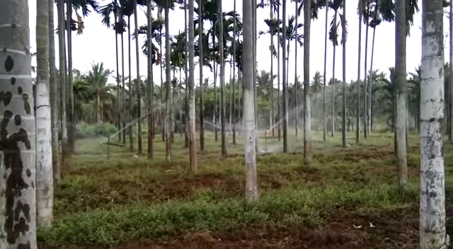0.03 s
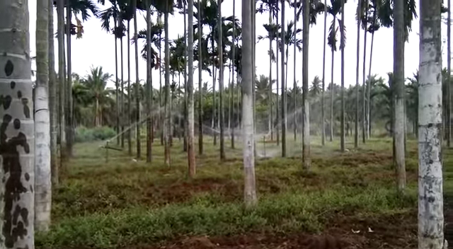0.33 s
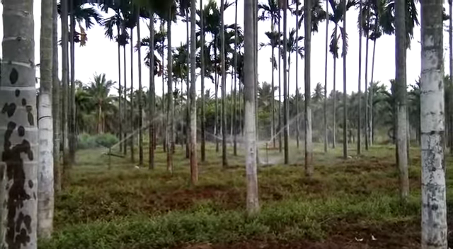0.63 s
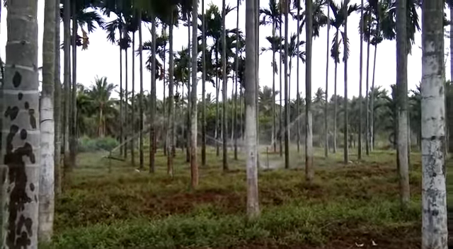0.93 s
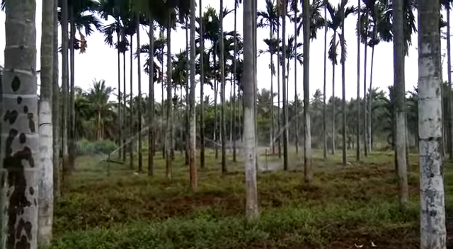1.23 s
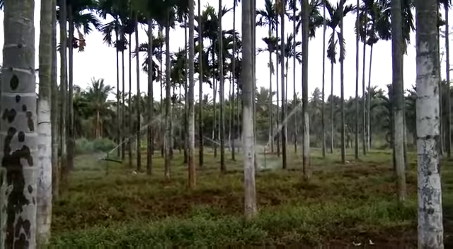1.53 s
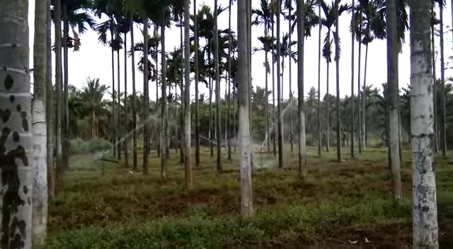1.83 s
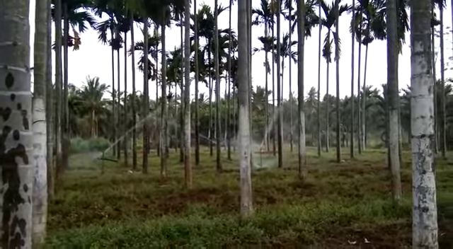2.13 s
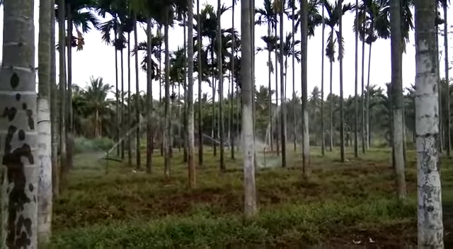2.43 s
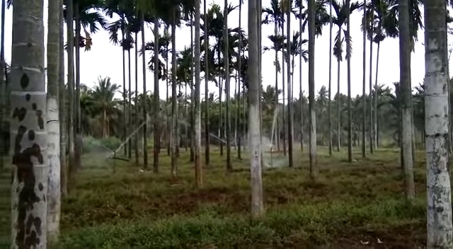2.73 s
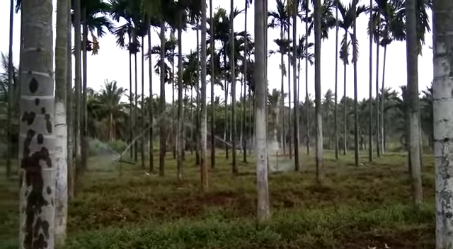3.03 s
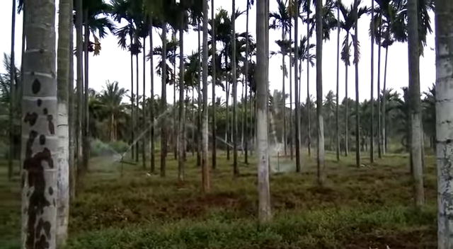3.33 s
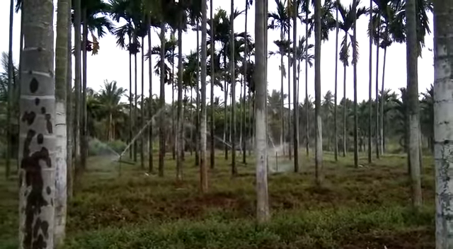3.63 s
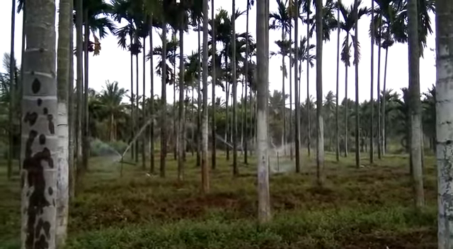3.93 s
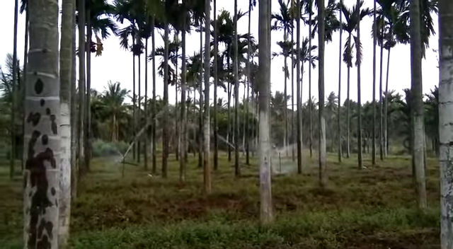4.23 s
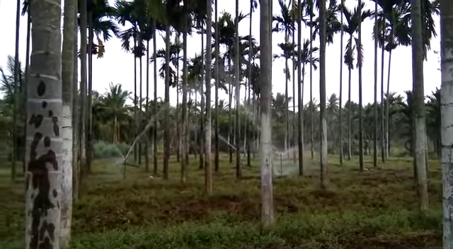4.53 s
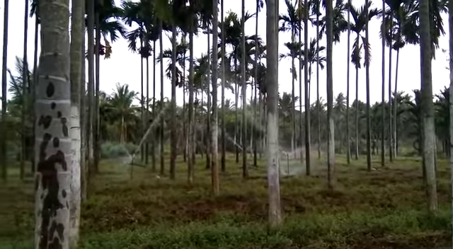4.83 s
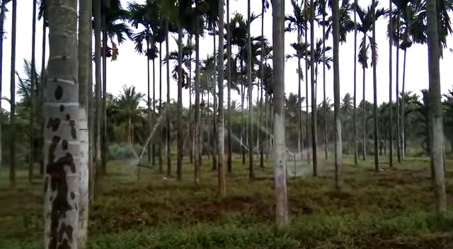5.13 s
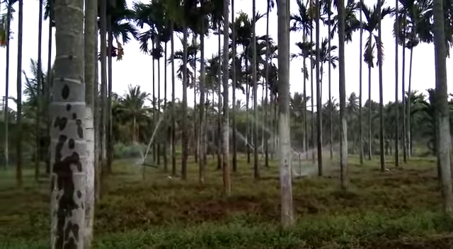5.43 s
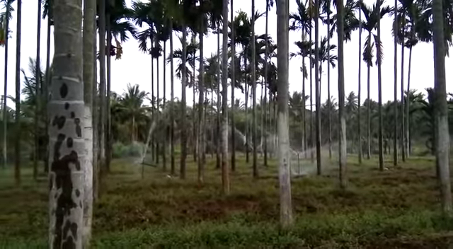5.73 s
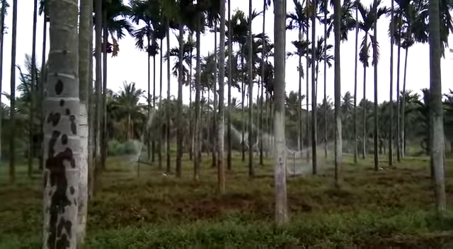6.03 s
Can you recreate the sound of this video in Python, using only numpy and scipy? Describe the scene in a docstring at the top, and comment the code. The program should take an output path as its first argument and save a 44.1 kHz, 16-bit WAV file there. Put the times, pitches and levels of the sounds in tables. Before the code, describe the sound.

An impact sprinkler ticks from start to finish, about six seconds, some way from a hand-held phone in a palm grove. Its arm slaps through the jet about five times a second, each tick bright, wet and slightly metallic, with a short echo. Water patters and hisses lightly on grass and leaves, swelling briefly around 1.1 seconds and then growing slowly. A few heavier drops tick on nearby leaves, the clearest at 0.7 seconds. Insects keep up a thin, high trill throughout. At 1.8 seconds the phone takes one soft, dull knock. Underneath lie a faint low rumble, a far rustle and a barely audible engine that sags near 2 seconds and picks up again. Faint gliding whistles, perhaps birds, come at the start and around 0.8, 3.5 and 5 seconds. A quiet low hum sets in at 5.5 seconds and holds.

```python
"""Palm grove, an impact sprinkler some way from a hand-held phone. Its arm slaps through the jet about
five times a second and rings; water patters on grass and leaves, swelling once as the jet sweeps foliage.
Insects scrape their wings, trilling near 7 kHz over a distant engine, faint whistles, rumble and rustle.
The phone takes one soft knock; a low hum sets in near the end."""
import sys
import numpy as np
from scipy import signal
from scipy.fft import rfft, irfft
from scipy.io import wavfile
from scipy.ndimage import uniform_filter1d

SR = 44100
rng = np.random.default_rng(int(sys.argv[2]) if len(sys.argv) > 2 else 0)


def log_audio(samples):
    """Write samples as a 16-bit WAV file to the path given in sys.argv[1]."""
    # one column per channel
    frames = np.atleast_2d(samples).T
    # limit to full scale, then quantise
    limited = np.clip(frames, -1, 1)
    pcm = np.round(limited * 32767).astype(np.int16)
    wavfile.write(sys.argv[1], SR, pcm)


N = 272097
TIME = np.arange(N) / SR

# arm swings: entry t/s, relative entry level/dB, relative exit level/dB
ARM_SWINGS = [(.022, -38, -34), (.231, -38, -41), (.460, -37, -32), (.663, -38, -42), (.893, -38, -38),
              (1.098, -36, -35), (1.313, -38, -31), (1.488, -34, -36), (1.697, -36, -34), (1.895, -37, -41),
              (2.131, -35, -40), (2.362, -36, -32), (2.557, -33, -36), (2.786, -38, -36), (2.988, -33, -32),
              (3.189, -34, -32), (3.392, -32, -35), (3.590, -35, -41), (3.824, -37, -36), (4.029, -36, -40),
              (4.255, -39, -34), (4.454, -36, -33), (4.656, -33, -37), (4.861, -35, -35), (5.073, -35, -39),
              (5.290, -34, -40), (5.518, -36, -37), (5.723, -38, -33), (5.927, -37, -34), (6.130, -36, -43)]
DWELL_S = .0175  # arm in the jet


def undb(db):
    """dB to gain."""
    return 10 ** (np.asarray(db) / 20)


def unit(x):
    """Scale to rms 1."""
    return x / np.sqrt(np.mean(x ** 2))


def curves(table):
    """Columns after t/s, interpolated over TIME."""
    times_s, *columns = np.transpose(table)
    return [np.interp(TIME, times_s, column) for column in columns]


def colour(x, points):
    """Filter by (f/Hz, level/dB) points; white noise keeps its power."""
    hz, db = np.transpose(points)
    bins_hz = np.maximum(np.fft.rfftfreq(N, 1 / SR), 1)
    gain = undb(np.interp(np.log(bins_hz), np.log(hz), db))
    skirts = np.minimum(bins_hz / hz[0], 1) ** 2 * np.minimum(hz[-1] / bins_hz, 1) ** 2
    return irfft(rfft(x) * unit(gain * skirts), N)


def walk(steps_per_s):
    """Random steps, smoothed twice; rms 1."""
    hold = max(int(SR / steps_per_s), 2)
    steps = np.repeat(rng.standard_normal(N // hold + 1), hold)
    return unit(uniform_filter1d(uniform_filter1d(steps, hold), hold)[:N])


def drops(per_s, spread_db):
    """Random impacts, many small, few large; rms 1."""
    size = undb(spread_db * np.minimum(rng.exponential(size=N), 7))
    hits = rng.random(N) < per_s / SR
    return unit(hits * size * rng.standard_normal(N))


def burst(peak_s, rise_s, fall_s):
    """Envelope: exponential rise and fall."""
    age_s = TIME - peak_s
    return np.exp(-np.minimum(np.maximum(-age_s / rise_s, age_s / fall_s), 20))


def sprinkler(enter_gain_db=4, leave_gain_db=3, sheet_db=-41, ragged_db=1, echo_db=-15, echo_s=.041):
    """The arm slaps into the jet, shreds it and flings it off; trunks scatter the sound."""
    # jet breaking on the arm: f/Hz, relative level/dB
    slap_spectrum = [(1000, -27.5), (1700, -14), (2400, -13.5), (2900, -22.5), (4200, -10), (4800, -15.5),
                     (5200, 0), (5900, 0.5), (6900, -9.5), (7900, -7), (8600, -21), (9300, -21),
                     (12000, -39.5), (15000, -26.5)]
    slaps, in_jet = np.zeros(N), np.zeros(N)
    for enter_s, enter_db, leave_db in ARM_SWINGS:
        leave_s = enter_s + DWELL_S
        slaps += undb(enter_db + enter_gain_db) * burst(enter_s, rise_s=.0016, fall_s=.003)
        slaps += undb(leave_db + leave_gain_db) * burst(leave_s, rise_s=.0016, fall_s=.002)
        in_jet += (TIME > enter_s - .005) & (TIME < leave_s + .005)
    sheet = undb(sheet_db) * uniform_filter1d(in_jet, size=360)
    lumps = unit(undb(ragged_db * walk(900)) * rng.standard_normal(N))  # jet breaks up unevenly
    direct = colour(np.hypot(slaps, sheet) * lumps, slap_spectrum)
    trunks = rng.standard_normal(N) * np.exp(-TIME / echo_s)
    echo = signal.fftconvolve(direct, trunks / np.linalg.norm(trunks))[:N]
    return direct + undb(echo_db) * echo


def arm_ring(mean_hz=5675, scatter_hz=259, gain_db=5):
    """Each slap briefly rings the metal arm, at a slightly different pitch."""
    out = np.zeros(N)
    for enter_s, enter_db, leave_db in ARM_SWINGS:
        for slap_s, db in ((enter_s, enter_db), (enter_s + DWELL_S, leave_db)):
            hz = mean_hz + scatter_hz * rng.standard_normal()
            envelope = undb(db + gain_db) * burst(slap_s, rise_s=.0007, fall_s=.0018)
            out += envelope * np.sin(2 * np.pi * hz * (TIME - slap_s))
    return out


def falling_water(patter_db=-47.5, mist_db=-67, turn_db_per_s=.68, sweep_s=1.11, sweep_width_s=.2):
    """Drops patter, mist hisses; both grow as the jet turns and swell as it sweeps foliage."""
    # drops on grass and leaves: f/Hz, relative level/dB
    patter_spectrum = [(700, -33), (1300, -15), (1800, -7), (3000, -7.5), (3900, -11), (4800, -6),
                       (5700, 1), (6800, 0.5), (7600, -7), (8400, -12.5), (9200, -13.5), (10200, -30.5),
                       (12000, -32)]
    # finest drops: f/Hz, relative level/dB
    mist_spectrum = [(4000, -27), (8500, -6), (10000, 1.5), (12000, -4.5), (14500, 5), (15500, 2)]
    foliage_db = 9 * np.exp(-((TIME - sweep_s) / sweep_width_s) ** 2)
    jet_db = turn_db_per_s * TIME + foliage_db
    impacts = unit(drops(per_s=10000, spread_db=2.26) + rng.standard_normal(N))
    patter = colour(impacts, patter_spectrum)
    mist = colour(drops(per_s=20000, spread_db=1.5), mist_spectrum)
    flicker_db = walk(25.005)
    patter *= undb(patter_db + .33 * jet_db + flicker_db)
    mist *= undb(mist_db + jet_db + flicker_db)
    return patter + mist


def drips():
    """Heavy drops tick on well-damped leaves nearby."""
    # leaf hits: t/s, level/dB, f/Hz, decay/s
    leaf_hits = [(.07, -44, 4300, .002), (.709, -38, 6600, .0015), (1.074, -45, 4600, .002),
                 (1.19, -44, 4200, .002), (1.542, -45, 3800, .002), (3.925, -44, 3600, .003),
                 (4.15, -48, 2800, .008), (4.15, -55, 600, .04), (4.166, -47, 3600, .008),
                 (4.551, -44, 5200, .0015), (5.345, -41, 4700, .0015)]
    out = np.zeros(N)
    for hit_s, db, hz, fall_s in leaf_hits:
        leaf = signal.butter(1, [.7 * hz, 1.3 * hz], "band", fs=SR, output="sos")
        splash = signal.sosfilt(leaf, signal.sosfilt(leaf, rng.standard_normal(N)))
        out += undb(db) * burst(hit_s, rise_s=.0005, fall_s=fall_s) * unit(splash)
    return out


def insect(phrases_per_s, top_hz, end_hz, stroke_s, scatter_db, drift_s=.007, jitter_s=.0005):
    """Each wing stroke drags scraper over file and slows: a short falling chirp."""
    # wing strokes of one phrase: t/s, relative level/dB
    phrase = [(0, 2), (0.0204, 0.5), (.046, -2)]
    out = np.zeros(N + SR)
    age_s = np.arange(int(stroke_s * SR)) / SR
    swell = np.sin(np.pi * age_s / stroke_s)
    cycles = top_hz * age_s + (end_hz - top_hz) * age_s ** 2 / (2 * stroke_s)
    beats_s = np.arange(rng.random(), phrases_per_s * N / SR) / phrases_per_s
    beats_s += np.interp(beats_s, TIME, drift_s * walk(1.5))
    for beat_s in beats_s:
        for lag_s, db in phrase:
            late, loud, sharp = rng.standard_normal(3)
            start = max(int((beat_s + lag_s + jitter_s * late) * SR), 0)
            chirp = swell * np.sin(2 * np.pi * cycles * (1 + .0053 * sharp))
            out[start:start + len(chirp)] += undb(db + scatter_db * loud) * chirp
    return unit(out[:N])


def insects(near_db=-6, second_db=-11, far_db=-2, flicker_db=2.07):
    """Two insects over a chorus that distance blurs to a hiss."""
    # all insects together: t/s, level/dB
    overall_level = [(0, -46), (1.15, -42.5), (1.85, -47.5), (2.35, -42.5), (3, -43), (3.25, -44.5),
                     (4.9, -41), (6.17, -42.5)]
    # far chorus: f/Hz, relative level/dB
    chorus_spectrum = [(5000, -66), (5800, -12), (6250, 2), (6550, 1.5), (7100, -0.5), (7350, -19),
                       (7900, -49)]
    near = insect(phrases_per_s=14.82, top_hz=7420, end_hz=6150, stroke_s=.0108, scatter_db=1.5)
    second = insect(phrases_per_s=14.6, top_hz=7300, end_hz=6000, stroke_s=.011, scatter_db=2.5)
    far = colour(rng.standard_normal(N), chorus_spectrum) * undb(flicker_db * walk(90))
    mix = undb(near_db) * near + undb(second_db) * second + undb(far_db) * far
    return undb(curves(overall_level)[0]) * mix


def knock(start_s=1.8156, peak_db=-15.5, size=4096):
    """A light blow on the phone's case: tick and short dull thump."""
    # case response: f/Hz, relative level/dB
    case_spectrum = [(40, -52), (75, -19), (120, -2.5), (195, 3), (300, -5), (500, -8), (750, -13),
                     (1100, -32), (1450, -30), (1850, -16.5), (2900, -36.5), (3600, -28), (5000, -65),
                     (9000, -79)]
    hz, db = np.transpose(case_spectrum)
    bins_hz = np.maximum(np.fft.rfftfreq(size, 1 / SR), 1)
    gain = undb(np.interp(np.log(bins_hz), np.log(hz), db))
    cepstrum = irfft(np.log(gain))
    # minimum phase: the case rings only after the blow
    ring = irfft(np.exp(rfft(2 * cepstrum[:size // 2], size)))
    out, start = np.zeros(N), int(start_s * SR)
    out[start:start + size] = undb(peak_db) * ring / np.abs(ring).max()
    return out


def drone(hz, octave_db):
    """Slightly wavering tone plus its octave; rms 1."""
    phase = 2 * np.pi * np.cumsum(hz * (1 + .0081 * walk(14))) / SR
    return unit(np.sin(phase) + undb(octave_db) * np.sin(2 * phase))


def hum(start_s=5.5, attack_s=.1, level_db=-50.5, settled_hz=88.7, sharp_hz=7, settle_s=.09):
    """A low hum swells, drops onto its pitch and holds."""
    age_s = np.maximum(TIME - start_s, 0)
    hz = settled_hz + sharp_hz * np.exp(-age_s / settle_s)
    waver_db = walk(16)
    envelope = np.minimum(age_s / attack_s, 1) * undb(level_db - waver_db)
    return envelope * drone(hz, octave_db=-24)


def engine():
    """A distant engine sags, picks up speed and fades."""
    # engine tone: t/s, f/Hz, level/dB
    engine_run = [(0, 150.2, -64), (1.6, 152.6, -64), (2.2, 134, -65), (2.7, 163.9, -62),
                  (3.55, 172, -62.5), (4.25, 164.4, -60.5), (5.15, 172.6, -60), (5.9, 151, -75)]
    hz, db = curves(engine_run)
    return undb(db) * drone(hz, octave_db=-16.5)


def whistles(blur=.035):
    """Faint gliding tones, perhaps birds, smeared by distance."""
    # glides: t/s, length/s, first f/Hz, last f/Hz, level/dB
    glides = [(0, 0.48, 1080, 1067, -59), (0.749, .45, 720, 790, -64), (3.498, 0.24, 863, 898, -60.5),
              (5.03, .5, 837, 985, -67)]
    out = np.zeros(N)
    for start_s, length_s, first_hz, last_hz, db in glides:
        progress = np.clip((TIME - start_s) / length_s, 0, 1)
        hz = (first_hz + (last_hz - first_hz) * progress) * (1 + blur * walk(120))
        envelope = undb(db) * np.sqrt(np.abs(np.sin(np.pi * progress)))
        out += envelope * np.sin(2 * np.pi * np.cumsum(hz) / SR)
    return out


def country(rumble_db=-57.5, waver_db=.74):
    """Low rumble of open land and a faint far rustle."""
    # rumble: f/Hz, relative level/dB
    rumble_spectrum = [(25, -15), (38, -22), (54, 2), (66, -6), (85, 3), (120, -1), (200, -5), (270, -9),
                       (380, -13), (600, -9), (900, -16), (2000, -33)]
    # rustle: f/Hz, relative level/dB
    rustle_spectrum = [(300, -38), (600, -1), (850, -1), (1200, 2), (1700, -1.5), (3000, -10), (5000, -17)]
    # rustle swells: t/s, level/dB
    rustle_level = [(0, -56.5), (.5, -61), (.92, -56.5), (1.35, -63), (1.75, -57), (2.05, -61), (4.9, -60),
                    (5.22, -55), (5.6, -59.5)]
    rumble = colour(rng.standard_normal(N), rumble_spectrum) * undb(rumble_db + waver_db * walk(5.96))
    rustle = colour(rng.standard_normal(N), rustle_spectrum) * undb(curves(rustle_level)[0])
    return rumble + rustle


def scene():
    """All sources at one microphone; both channels equal."""
    water = sprinkler() + falling_water() + drips()
    far = country() + engine() + hum() + whistles()
    mono = water + far + insects() + arm_ring() + knock()
    return np.array([mono, mono])


def record(dry):
    """The phone's steep low-pass."""
    cutoff_hz = 15700
    return signal.sosfilt(signal.ellip(10, .2, 70, cutoff_hz, fs=SR, output="sos"), dry)


dry = scene()
out = record(dry)
log_audio(out)
```